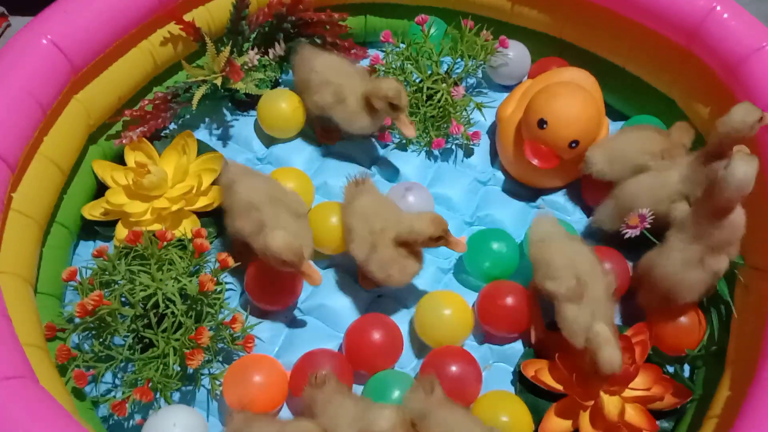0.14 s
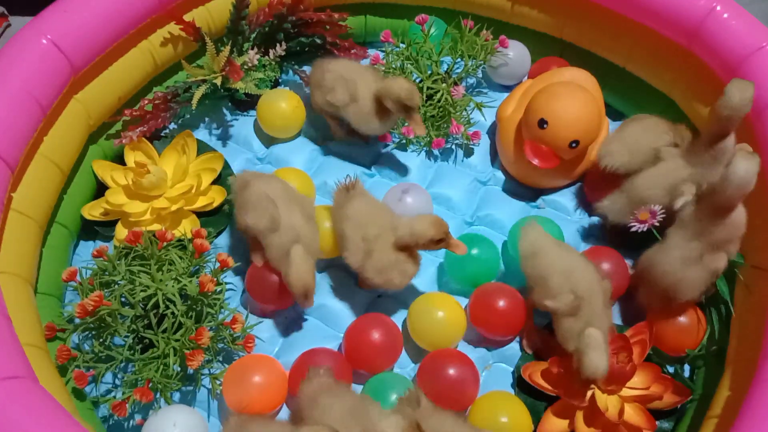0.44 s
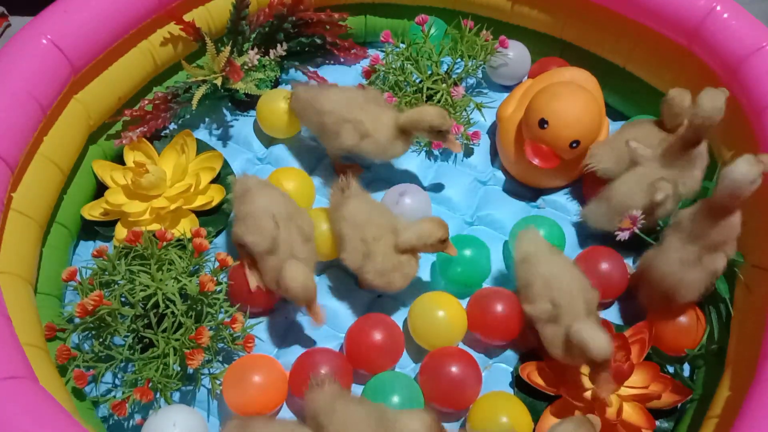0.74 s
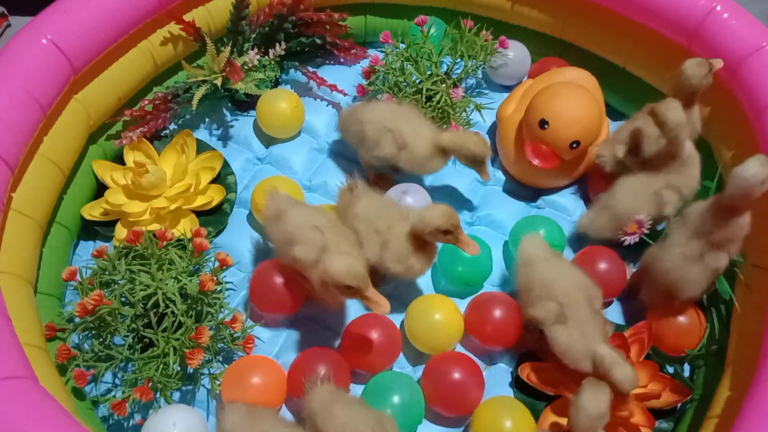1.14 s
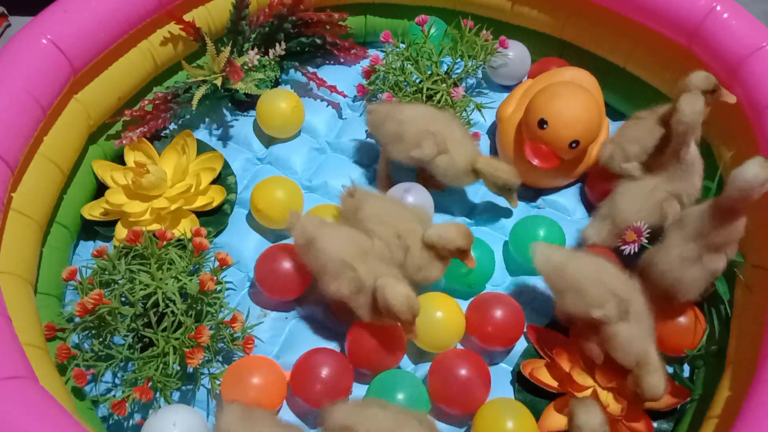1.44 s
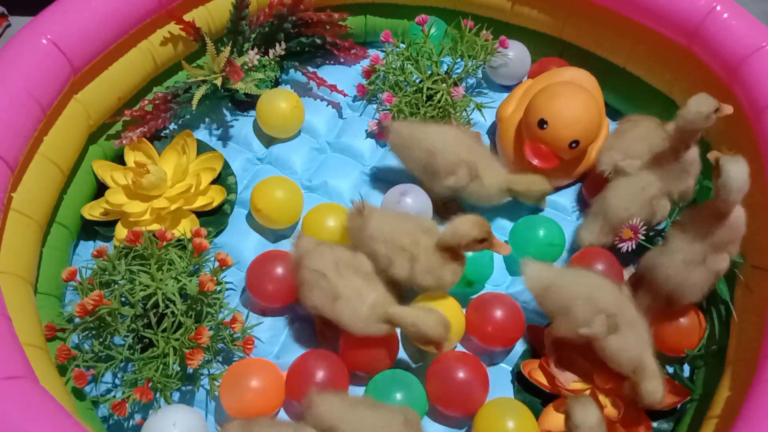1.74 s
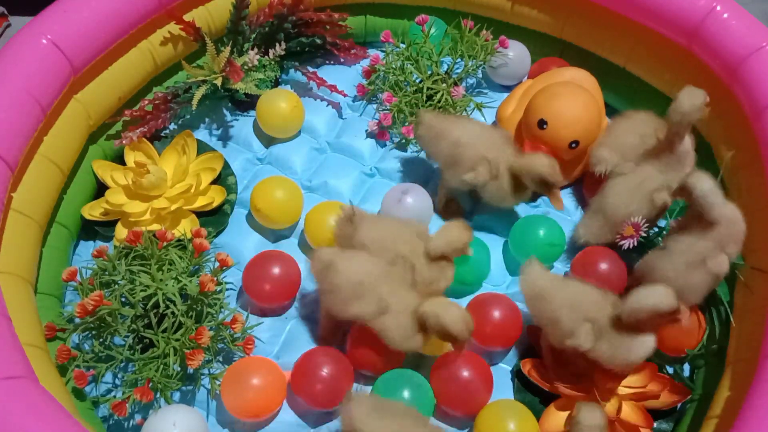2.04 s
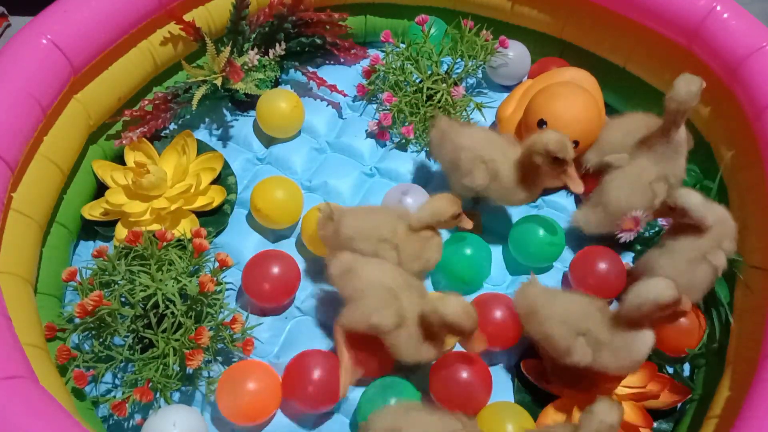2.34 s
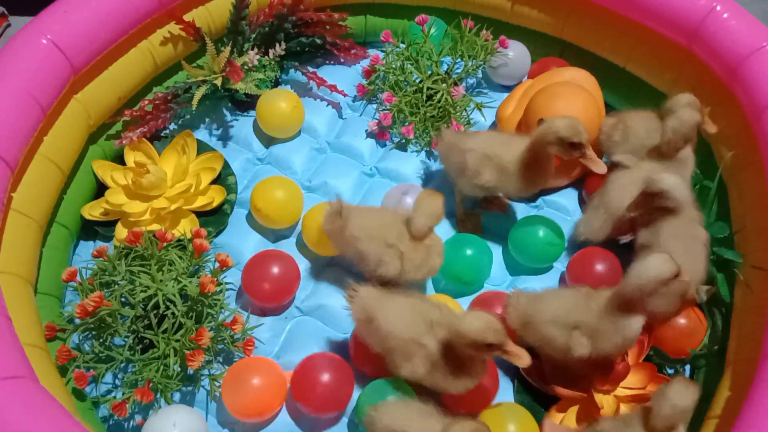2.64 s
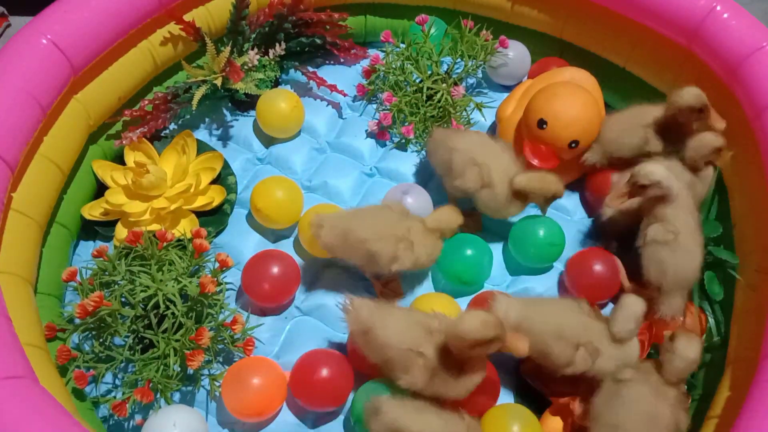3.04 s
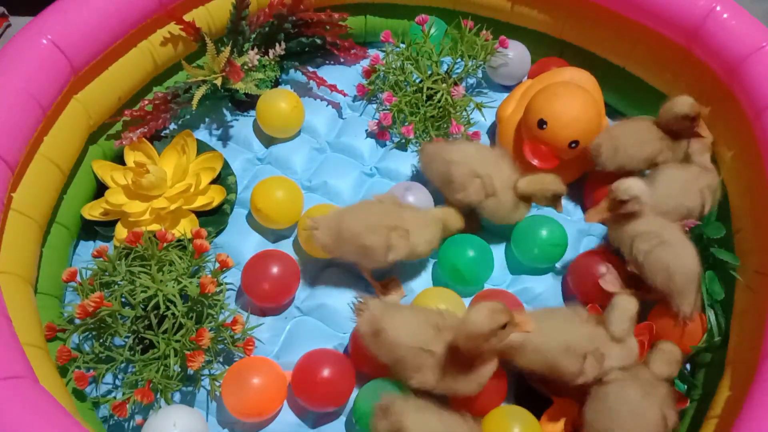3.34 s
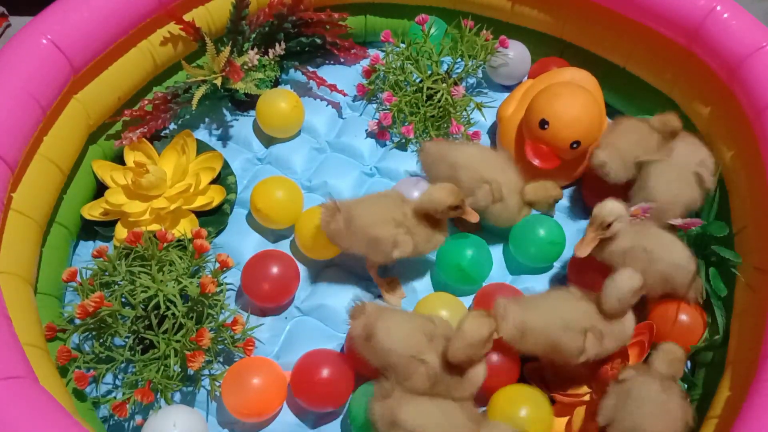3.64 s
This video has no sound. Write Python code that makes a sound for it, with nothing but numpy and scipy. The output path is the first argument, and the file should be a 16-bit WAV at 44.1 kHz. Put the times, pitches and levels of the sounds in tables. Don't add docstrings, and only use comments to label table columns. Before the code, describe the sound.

Ducklings peep in quick overlapping chirps while plastic balls knock and feet scuff a vinyl pool.

```python
import sys
import numpy as np
from scipy import signal
from scipy.fft import rfft, irfft
from scipy.io import wavfile
from scipy.ndimage import uniform_filter1d

SR = 44100
rng = np.random.default_rng(int(sys.argv[2]) if len(sys.argv) > 2 else 0)


def voltage_ratio(decibels):
    exponent = np.asarray(decibels, float) / 20
    return 10 ** exponent


def unload_wav(signal):
    wavfile.write(
        sys.argv[1],
        SR,
        np.round(np.clip(np.atleast_2d(signal).T, -1, 1) * 32767).astype(np.int16),
    )


N = 167580
LEAD = 4410

# frequency in Hz, level in dB.
YARD_SPECTRUM = [(25, -64), (110, 1), (1500, -0.5), (2300, -21), (3300, -6), (4200, -11), (8000, -9.5),
                 (15800, -23.5)]
YARD_DB, YARD_PATCH_DB = -45.5, 5.5

# frequency in Hz, level in dB.
HUM_LINES = [(100.3, -45), (301, -54)]
HUM_SWELL_DB, HUM_FUZZ_DB = 1.8, -58

# frequency in Hz, width in Hz, level in dB.
WING_RESONANCES = [(6676, 57, 6.5), (7343, 570, 13.5)]
INSECT_DB, INSECT_SWELL_DB = -41, 2

# time in seconds, peak
# level in dB, pitch in Hz.
CHIRPS = [(0.0, -30.5, 5160), (0.258, -28.5, 5870), (0.4454, -28.5, 5530), (0.799, -28, 4970),
          (0.965, -24.5, 5170), (1.377, -19, 4430), (1.399, -26.5, 5940), (1.425, -25, 5170),
          (1.6, -26.5, 5240), (2.575, -33, 4250), (2.82, -37, 4530), (2.995, -31.5, 5200),
          (3.321, -36.5, 5540), (3.408, -43, 4550), (3.483, -26.5, 5300)]
CHIRP_S, CHIRP_RISE, CHIRP_WIDE_HZ, CHIRP_T60 = .05, .13, 480, .2

# time in seconds, peak level in dB.
TICKS = [(0.1367, -23), (0.2923, -34), (0.577, -28), (0.6824, -10.5), (0.9467, -28), (1.157, -17.5),
         (1.6906, -16), (1.9645, -21.5), (2.1895, -25), (2.3157, -14), (2.0128, -35), (2.9865, -30),
         (3.1706, -21), (3.6044, -22), (3.651, -26), (3.208, -14.5)]
SNAP_T60, PUFF_DB, PUFF_T60 = 0.0088, -8, 0.072

# start in seconds, length in seconds, hiss level in dB,
# thud level in dB over the hiss, fizz level in dB over the hiss.
SCUFFS = [(0.255, 0.12, -35, -8, 1.5), (0.403, 0.1, -36, -27, 2.5), (0.545, 0.046, -40.5, -3.5, 6.5),
          (0.676, 0.04, -28.5, -5, 3), (1.18, 0.16, -35.5, -7, -5), (1.371, 0.097, -33, -13.5, -1),
          (1.693, 0.014, -52, -10, 6), (1.759, 0.033, -53, 20, 9), (2.035, 0.036, -36, 2, 8.5),
          (2.152, 0.078, -39, 6, 4), (2.322, 0.026, -37, 6, 5), (2.408, 0.086, -34.5, -4, 3),
          (2.512, 0.028, -42.5, 1, 5), (2.61, 0.062, -33, -3, -1), (3.02, 0.095, -48.5, 5.5, 4),
          (3.131, 0.17, -36.5, 6, 3.5), (3.51, 0.099, -33.5, -0.5, 5)]
SCUFF_PEAK, SCUFF_SOFT = 0.86, 2.42
GRIT_DB, FIZZ_DB = 1, -9

# frequency in Hz, level in dB.
VINYL_SPECTRUM = [(1800, -7), (3000, -1), (4100, -2), (5500, -3), (7200, -6), (9500, -19), (12000, -32)]

# frequency in Hz, level in dB.
FIZZ_SPECTRUM = [(8000, -40), (10500, -11.5), (13000, -13.5), (15000, 1), (15900, -1.5)]

# frequency in Hz, level in dB.
SLUMP_SPECTRUM = [(200, -14), (450, -13), (700, -4.5), (1370, 0), (1900, -6), (2500, -35)]

# time in seconds, peak level in dB, pitch in Hz.
DROPS = [(0.005, -35, 238), (0.137, -24.5, 1364), (0.217, -27, 1460), (0.678, -29, 770), (0.698, -25, 1310),
         (0.973, -28, 1260), (1.173, -30, 980), (1.243, -23.5, 1300), (1.255, -19, 1560),
         (1.268, -22, 1530), (1.306, -28, 1640), (1.685, -22, 1090), (1.709, -22, 1250),
         (1.79, -19.5, 1240), (1.805, -28, 745), (1.225, -24, 2100), (1.905, -33.5, 870),
         (2.068, -23.5, 670), (2.166, -20, 2080), (2.18, -28, 1300), (2.22, -28, 797), (2.41, -33, 1020),
         (2.481, -15.5, 2060), (2.481, -31, 490), (2.498, -32, 523), (2.525, -34.5, 395), (2.545, -47, 417),
         (2.67, -31, 1020), (2.985, -30, 1310), (3.136, -25, 1310), (3.302, -15, 2150), (3.315, -16, 1310),
         (3.394, -31.5, 1210), (3.544, -24, 1170), (3.555, -19, 1260), (3.578, -27.5, 610), (3.6, -26, 800),
         (3.777, -32.5, 1260)]
DROP_CYCLES, DROP_RISE, DROP_WET_DB = 22.7, 0.056, -3

# time in seconds, peak level in dB, pitch in Hz.
KNOCKS = [(1.015, -16.5, 1306), (1.165, -12, 1400), (1.691, 4, 1190), (1.774, -23, 1180),
          (2.037, -10.5, 1320), (2.2, -15.5, 730), (2.316, -6, 1090), (2.652, -23, 1480),
          (3.03, -27.5, 1260), (3.17, -16.5, 1330), (3.197, 0.5, 1304), (3.207, -7, 1060),
          (3.304, -15, 1387)]

# ratio to the pitch, level in dB, time to fade 60 dB in seconds.
BALL_MODES = [(.57, -2, 0.0076), (1.0, 12, 0.0039), (1.25, -13.5, 0.011), (2.702, -13.5, 0.0064)]
RATTLE_DB, RATTLE_T60 = -4, .17

# top of the arch in seconds, top pitch in Hz, level in dB, length in seconds.
NEAR_PEEPS = [(0.095, 2936, -22.5, 0.042), (0.138, 3435, -21.5, 0.053), (0.211, 3382, -25, 0.055),
              (0.25, 3153, -21, 0.053), (0.335, 3420, -26, 0.065), (0.388, 3293, -18.5, 0.05),
              (0.491, 3600, -20.5, 0.055), (0.564, 3520, -23, 0.056), (0.65, 3410, -19, 0.055),
              (1.038, 3054, -21.5, 0.068), (1.064, 3638, -15, 0.046), (1.224, 3600, -23, 0.066),
              (1.241, 3304, -20.5, 0.064), (1.363, 3453, -25.5, 0.059), (1.397, 4052, -17.5, 0.055),
              (1.604, 3810, -22, 0.051), (1.812, 3100, -25.5, 0.058), (1.857, 3080, -23, 0.055),
              (2.082, 3397, -22, 0.058), (2.127, 3740, -21.5, 0.056), (2.298, 3670, -22.5, 0.057),
              (2.362, 3846, -18, 0.063), (2.425, 3120, -24.5, 0.057), (2.584, 3254, -23.5, 0.054),
              (2.741, 3497, -23, 0.061), (2.831, 3593, -23, 0.055), (3.096, 3510, -21.5, 0.051),
              (3.286, 3603, -20, 0.056)]

# top of the arch in seconds, top pitch in Hz, level in dB, length in seconds.
FAR_PEEPS = [(-0.015, 3290, -17.5, 0.051), (0.009, 3934, -19.5, 0.039), (0.18, 3900, -22.5, 0.057),
             (0.393, 3710, -29, 0.058), (0.439, 3890, -29, 0.041), (0.587, 3985, -22, 0.054),
             (0.796, 2446, -33.5, 0.043), (0.81, 3800, -26, 0.06), (0.825, 3930, -26, 0.05),
             (0.87, 3250, -31, 0.051), (0.95, 2838, -31.5, 0.063), (0.985, 3946, -22, 0.056),
             (1.12, 3080, -29, 0.049), (1.129, 3700, -45, 0.048), (1.411, 3900, -16, 0.048),
             (1.443, 3880, -26, 0.055), (1.568, 3710, -27, 0.047), (1.629, 3890, -27, 0.043),
             (1.647, 3844, -35, 0.047), (1.869, 3000, -33, 0.052), (1.947, 3760, -32.5, 0.041),
             (2.043, 3210, -23, 0.05), (2.034, 3465, -30, 0.047), (2.296, 4880, -33, 0.06),
             (2.423, 4040, -24, 0.053), (2.459, 4050, -27, 0.06), (2.545, 3960, -23.5, 0.06),
             (2.733, 3180, -31.5, 0.064), (2.942, 3480, -37.5, 0.066), (3.004, 4000, -22, 0.068),
             (3.051, 3485, -27.5, 0.058), (3.236, 3890, -25, 0.051), (3.337, 2854, -28.5, 0.053),
             (3.419, 4016, -29, 0.055), (3.433, 3930, -33, 0.054), (3.496, 2960, -34.5, 0.051),
             (3.617, 3300, -36.5, 0.056)]

OVERTONE_DB = [-25, -33, -48]

# frequency in Hz, gain in dB.
BEAK_GAIN = [(1800, -4.5), (2600, -0.5), (3400, 0.5), (3650, -2.5), (3900, -13.5), (4350, -2), (4800, 2.5)]
DROOP, SPAN, SWELL = .35, 1.101, 1.03
LEAN_DB, BREATH_DB = 1.5, -22
FLUTTER_DB, FAR_FLUTTER_DB = 2.8, 2.6
WALL_S, WALL_DB, WALL_FADE_DB = .0185, -15.5, -4.5
POOL_T60, POOL_DB = .19, -7.5

NOTCH_HZ, NOTCH_WIDE_HZ, NOTCH_SHARE = 4300, 1000, .68
EDGE_HZ = 15780


def evened(x):
    return x / np.sqrt(np.mean(x ** 2) + 1e-20)


def add(mix, s, sound):
    part = mix[max(round(s * SR) + LEAD, 0):][:len(sound)]
    part += sound[:len(part)]


def coloured(x, points):
    f, db = np.transpose(points)
    hz = np.fft.rfftfreq(len(x), 1 / SR)
    gain_db = np.interp(np.log(hz + 1), np.log(f), db, -90, -90)
    return irfft(rfft(x) * voltage_ratio(gain_db), len(x))


def drift(rate_hz, size=N):
    t = np.arange(size) / SR
    rates = np.geomspace(rate_hz / 20, rate_hz, num=16)
    return evened(sum(np.sin(2 * np.pi * (f * t + rng.random())) / np.sqrt(f) for f in rates))


def resonate(x, hz, width_hz):
    turn = np.exp(2j * np.pi * np.cumsum(hz * np.ones(len(x))) / SR)
    r = np.exp(-np.pi * width_hz / SR)
    return 2 * (turn * signal.lfilter([1 - r], [1, -r], x / turn)).real


def tail(x, t60):
    taps = np.zeros(13000)
    at = np.arange(150, 12900, 20)
    taps[at + rng.integers(0, 20, len(at))] = rng.choice([-1., 1.], len(at))
    taps *= voltage_ratio(-60 * np.arange(13000) / SR / t60)
    return signal.oaconvolve(x, taps / np.linalg.norm(taps))[:len(x)]


def patchy(x, db):
    z = signal.stft(x, nperseg=512)[2]
    patches = uniform_filter1d(rng.standard_normal(z.shape), size=8, axis=0)
    patches = evened(uniform_filter1d(patches, size=6, axis=1))
    return evened(signal.istft(z * voltage_ratio(db * patches), nperseg=512)[1][:N])


def yard():
    return voltage_ratio(YARD_DB) * patchy(coloured(rng.standard_normal(N), YARD_SPECTRUM), YARD_PATCH_DB)


def hum():
    t = np.arange(N) / SR
    lines = np.zeros(N)
    for hz, db in HUM_LINES:
        level = np.sqrt(2) * voltage_ratio(db + HUM_SWELL_DB * drift(7.4))
        lines += level * np.sin(2 * np.pi * hz * t + 0.88 * drift(4.6))
    third_hz = HUM_LINES[1][0]
    return lines + voltage_ratio(HUM_FUZZ_DB) * evened(resonate(rng.standard_normal(N), third_hz, 52))


def insects():
    buzz = rng.standard_normal(N)
    chorus = np.zeros(N)
    for hz, width, db in WING_RESONANCES:
        chorus += voltage_ratio(db) * evened(resonate(resonate(buzz, hz, width), hz, width))
    return voltage_ratio(INSECT_DB + 3 + INSECT_SWELL_DB * drift(21)) * patchy(chorus, db=3.5)


def sparrows():
    mix, t = np.zeros(N + LEAD), np.arange(0, CHIRP_S, 1 / SR)
    air = rng.standard_normal((len(CHIRPS), 4000))
    for (s, db, hz), puff in zip(CHIRPS, air):
        pitch = hz * (1 + CHIRP_RISE * (np.sin(.6 * np.pi * t / CHIRP_S) - .7))
        husk = resonate(puff[:len(t)], pitch, CHIRP_WIDE_HZ)
        husk = evened(resonate(husk, pitch, CHIRP_WIDE_HZ))
        add(mix, s - .005, voltage_ratio(db - 2.5) * np.sin(np.pi * t / CHIRP_S) * husk)
    return (mix + voltage_ratio(-6) * tail(mix, CHIRP_T60))[LEAD:]


def ticks():
    mix, t = np.zeros(N + LEAD), np.arange(6000) / SR
    for (s, db), air in zip(TICKS, rng.standard_normal((len(TICKS), 6000))):
        decay = voltage_ratio(-60 * t / SNAP_T60) + voltage_ratio(PUFF_DB - 60 * t / PUFF_T60)
        add(mix, s, voltage_ratio(db) * air * decay)
    return voltage_ratio(4.5) * (coloured(mix, VINYL_SPECTRUM) + voltage_ratio(-4) * coloured(mix, FIZZ_SPECTRUM))[LEAD:]


def scuffs():
    hiss, thud, fizz = np.zeros((3, N + LEAD))
    for start, length, db, thud_db, fizz_db in SCUFFS:
        u = np.arange(0, 1, 1 / (SR * (length + 0.1)))
        stroke = np.sin(np.pi * u ** SCUFF_PEAK) ** SCUFF_SOFT
        add(hiss, start - .045, voltage_ratio(db + 5) * stroke)
        add(fizz, start - .045, voltage_ratio(db + 4.5 + FIZZ_DB + fizz_db) * stroke)
        add(thud, start - .035, voltage_ratio(db + thud_db) * stroke)
    roughness = np.minimum(rng.exponential(1, (2, N)), 5)
    grit = voltage_ratio(GRIT_DB * roughness) * rng.standard_normal((2, N))
    uneven = voltage_ratio(4.8 * drift(90))
    crackle = grit[1] * (rng.random(N) < 2500 / SR)
    slump = patchy(coloured(crackle, SLUMP_SPECTRUM), db=4.5)
    rub = patchy(coloured(grit[0], VINYL_SPECTRUM), db=4.0)
    fine_rub = patchy(coloured(grit[0], FIZZ_SPECTRUM), db=5.0)
    return uneven * (hiss[LEAD:] * rub + fizz[LEAD:] * fine_rub + thud[LEAD:] * slump)


def drops():
    mix = np.zeros(N + LEAD)
    for s, db, hz in DROPS:
        u = np.arange(0, 1, hz / (DROP_CYCLES * SR))
        tone = np.sin(2 * np.pi * DROP_CYCLES * (u + DROP_RISE * u ** 2))
        add(mix, s, voltage_ratio(db + 5 - 60 * u) * np.minimum(u / 0.086, 1) * tone)
    return (mix + voltage_ratio(DROP_WET_DB) * tail(mix, RATTLE_T60))[LEAD:]


def knocks():
    mix, t = np.zeros(N + LEAD), np.arange(2000) / SR
    for s, db, hz in KNOCKS:
        ring = sum(voltage_ratio(d - 60 * t / t60) * np.sin(2 * np.pi * hz * ratio * t) for ratio, d, t60 in BALL_MODES)
        add(mix, s - .001, voltage_ratio(db + 3) * ring * np.minimum(t / 0.0019, 1))
    scattered = mix + voltage_ratio(RATTLE_DB) * tail(mix, RATTLE_T60)
    return coloured(scattered, [(100, -40), (600, 0.5), (16000, 2)])[LEAD:]


def peeps():
    mix = np.zeros(N + LEAD)
    wobble, air = drift(219.63, size=30000), rng.standard_normal(30000)
    for k, (top_s, hz, db, length) in enumerate([*NEAR_PEEPS, *FAR_PEEPS]):
        t = np.arange(-SPAN * length / 2, SPAN * length / 2, 1 / SR)
        u = 2 * t / length
        cut = slice(k * 397, k * 397 + len(t))
        pitch = hz * (1 - DROOP * u ** 2)
        phase = 2 * np.pi * np.cumsum(pitch) / SR
        tone = np.sin(phase)
        for n, overtone_db in enumerate(OVERTONE_DB):
            tone += voltage_ratio(overtone_db - 8 * u ** 2) * np.sin((n + 2) * phase)
        tone += voltage_ratio(BREATH_DB) * evened(resonate(resonate(air[cut], pitch, 630), pitch, 570))
        flutter_db = FLUTTER_DB + FAR_FLUTTER_DB * (k >= len(NEAR_PEEPS))
        beak_db = np.interp(pitch, *np.transpose(BEAK_GAIN))
        shape = np.abs(np.cos(np.pi / 2 * u / SPAN)) ** SWELL
        shape *= voltage_ratio(LEAN_DB * u + flutter_db * wobble[cut] + beak_db)
        add(mix, top_s + t[0], voltage_ratio(db + 6.5) * shape * tone)
    slaps = np.zeros(N + LEAD)
    for k in range(3):
        slaps += voltage_ratio(WALL_DB + WALL_FADE_DB * k) * np.roll(mix, round((k + 1) * WALL_S * SR))
    stirred = mix * evened(uniform_filter1d(rng.standard_normal(N + LEAD), size=260))
    return (mix + slaps + voltage_ratio(POOL_DB) * tail(stirred, POOL_T60))[LEAD:]


def scene():
    return (peeps() + scuffs() + knocks() + drops() + ticks() + sparrows() + insects() + hum() + yard())[None]


def low_pass(x):
    return signal.sosfilt(signal.butter(12, 16870, fs=SR, output="sos"), x)


def record(dry):
    heard = dry[0] - NOTCH_SHARE * resonate(dry[0], NOTCH_HZ, NOTCH_WIDE_HZ)
    limited = np.tanh(heard)
    band_edge = signal.ellip(8, .5, 70, EDGE_HZ, fs=SR, output="sos")
    finished = signal.sosfiltfilt(band_edge, limited)[None]
    return low_pass(finished)


dry = scene()
out = record(dry)
unload_wav(out)
```